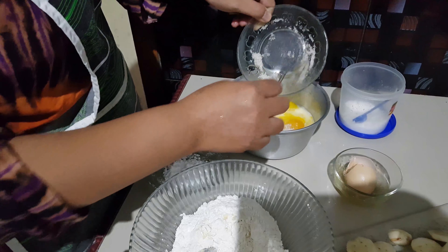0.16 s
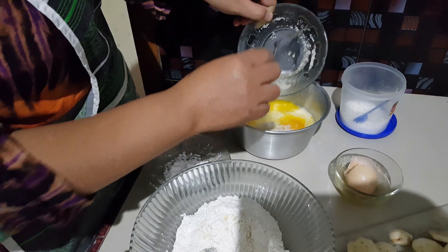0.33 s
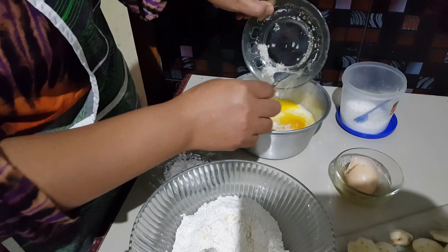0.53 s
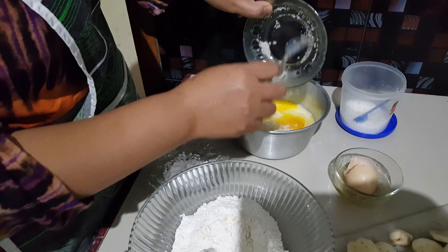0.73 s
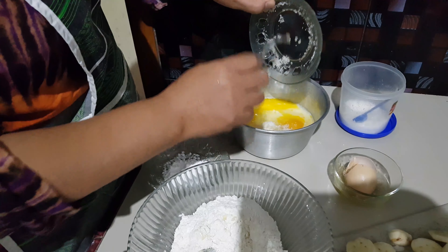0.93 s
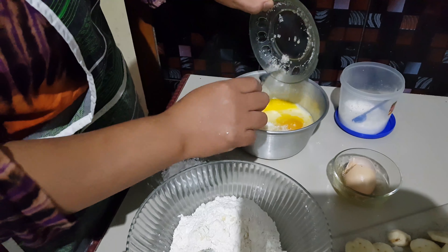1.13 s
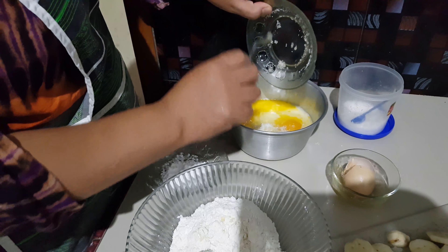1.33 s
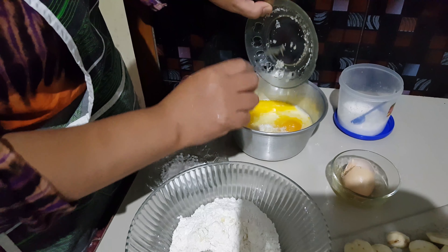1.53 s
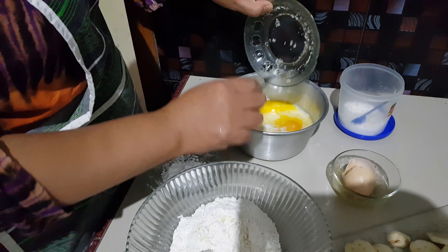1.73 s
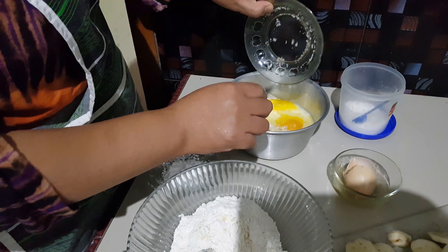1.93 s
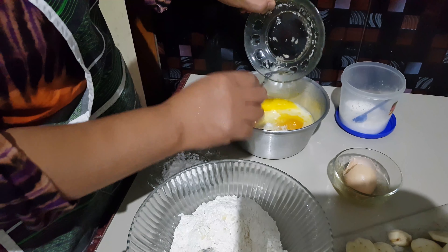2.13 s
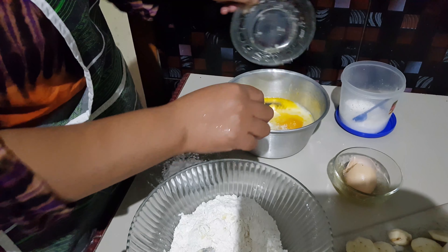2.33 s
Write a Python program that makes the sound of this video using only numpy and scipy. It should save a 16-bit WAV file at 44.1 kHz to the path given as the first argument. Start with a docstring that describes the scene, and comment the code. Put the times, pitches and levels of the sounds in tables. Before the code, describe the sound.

Sharp, irregular spoon clinks on a hand-held glass bowl, with gritty sugar scrapes in a small kitchen

```python
"""A metal spoon knocks and scrapes sugar out of a small hand-held glass bowl, about three strokes a second.
Knocks are filtered pushes that ring damped glass and spoon modes plus a noise clack; scrapes are
trains of grain cracks that drive the glass; squeals are gliding tones; sliding sugar is fading crack noise.
A small kitchen answers with a noise-tail echo over low rumble and hum; a fast limiter eases the peaks."""
import sys
import numpy as np
from scipy import signal
from scipy.fft import rfft, irfft
from scipy.io import wavfile
from scipy.ndimage import uniform_filter1d, minimum_filter1d

SR = 44100
rng = np.random.default_rng(int(sys.argv[2]) if len(sys.argv) > 2 else 0)


def master_out(mix):
    """Clip the mix to full scale and print it as 16-bit PCM to the path in sys.argv[1]."""
    frames = np.transpose(np.atleast_2d(mix))
    ceiling = np.clip(frames, -1, 1)
    pcm = np.round(ceiling * 32767).astype(np.int16)
    wavfile.write(sys.argv[1], SR, pcm)


N = 104472
T = np.arange(N) / SR

# corner points of the force spectra of knocks and scrapes: [f/Hz]
FORCE_HZ = (600, 2000, 4700, 7500, 13000)
# glass modes damped by the fingers: [f/Hz, t60/s, level over the clack/dB]
BOWL_MODES = [(597, .05, 1), (4637, 0.042, 22), (4695, 0.023, -3), (5680, 0.068, -12.5),
              (7506, 0.033, 17.5), (7582, 0.046, 9), (11350, 0.029, 17.5), (11500, .035, 16),
              (14100, 0.031, 16.5), (15200, .03, 10.5)]


def undb(db):
    """Amplitude factor of a level in dB."""
    return 10 ** (np.asarray(db) / 20)


def curve(hz, points):
    """Straight lines through (Hz, value) points on a log frequency axis."""
    f, v = np.array(points, float).T
    return np.interp(np.log(np.maximum(hz, 1)), np.log(f), v)


def convolve(x, response):
    """Response of a linear system, cut to the scene's length."""
    return signal.fftconvolve(np.atleast_2d(x), np.atleast_2d(response), axes=-1)[:, :N]


def colour(x, points, size=2048):
    """Minimum-phase filter of the given (Hz, dB) shape, by folding the cepstrum."""
    cepstrum = irfft(np.log(undb(curve(np.fft.rfftfreq(size, 1 / SR), points))))
    cepstrum[1:size // 2] *= 2
    cepstrum[size // 2 + 1:] = 0
    return convolve(x, irfft(np.exp(rfft(cepstrum))))


def lowpass(x, hz):
    """Second-order Butterworth low-pass."""
    return signal.sosfilt(signal.butter(2, min(hz, .45 * SR), fs=SR, output="sos"), x)


def fade(t, t60):
    """Exponential decay, -60 dB at t60."""
    return np.exp(-np.log(1000) * t / t60)


def walk(rate_hz):
    """Smooth random wander of spread 1."""
    v = lowpass(rng.standard_normal(N), rate_hz)
    return v / v.std()


def gate(t, length, edge, release):
    """Linear rise, hold and release."""
    rise = np.clip(t / edge, 0, 1)
    return rise * np.clip((length - t) / min(release, length / 2), 0, 1)


def add(out, start, x):
    """Mix x into out from start, in seconds."""
    i = max(int(start * SR), 0)
    x = np.ravel(x)[:N - i]
    out[i:i + len(x)] += x


def knocks():
    """Each knock is one sharp push that rings glass and spoon, with a freshly drawn clack."""
    # spoon meets bowl: [t/s, force at each FORCE_HZ/dB (five columns), spoon ring/dB]
    blows = [ (0.1136, 8.5, 26.5, 20.5, 1, 14, -11), (.389, 15.5, 1, -20, 1, -26, -12),
             (.398, 11.5, 17.5, 2.5, 1, -11, -3.5), (0.5189, 10, 23.5, 10.5, 8, 21, -3),
             (.712, 15.5, 15, 11.5, 6, 4.5, -18.5), (1.035, 12.5, 17.5, 0, 15.5, 8, -37.5),
             (1.05, -9, 7, 15.5, -6.5, 10, -37), (1.068, 0, -2, -5, -5, -1, -20),
             (1.099, 9.5, 18, 14.5, 7, 8, -10), (1.165, -6.5, 0.5, -0.5, -0.5, -9, -1.5),
             (1.316, 12, 17, 15, 12.5, 2, -23), (1.331, 9, 16, 0, -10, -15, -22),
             (1.3374, 11, 18.5, -2, 13.5, 8, -27), (1.3699, 14, 27.5, 13, 17.5, 9, -26),
             (1.567, -29, -17, -18, -17, -10.5, -24), (1.614, 17.5, 19.5, 19, 16.5, 7, -27),
             (1.654, 20, 24.5, 18, 11, 10, -21), (1.713, -14, -3, -8, -8, -7.5, -24),
             (1.8812, 13.5, 23, 23.5, 18.5, 11.5, -39), (1.899, 12.5, 14, 6, -17, -11, -20),
             (1.907, 10.5, 18, 13, 9, 4, -14), (2.0222, -9, -3, -9, -7.5, -0.5, 2.5),
             (2.077, -24, 1.5, -10, -5.5, -2, 1), (2.1611, 5, 20, 11.5, 12.5, 14.5, -1.5),
             (2.2083, -7, 7.5, 4.5, 14, 12, -1.5)]
    # spoon modes: [f/Hz, t60/s, level over the clack/dB]
    spoon_modes = [(1976, 0.054, 2), (2517, 0.071, 12), (4124, 0.03, 21), (5924, 0.096, 20.5),
                   (5982, 0.053, 21), (8210, 0.026, 18), (13900, 0.043, 14.5), (15400, 0.043, -11.5)]
    # clean clink against the full clack: [f/Hz, level/dB]
    clink = [(250, 0.5), (330, -1.5), (430, 1.5), (900, -1), (2100, 0), (3100, -2.5), (4000, -3),
             (6000, -2.5), (9000, -0.5)]
    out, glass, metal = np.zeros((2, N)), ring(BOWL_MODES), ring(spoon_modes)
    for start, *force_db, spoon_db in blows:
        push = colour(np.ones(1), list(zip(FORCE_HZ, force_db)))
        contact = colour(clack(), clink)[:, :len(glass)]
        sound = convolve(push, contact + glass + undb(spoon_db) * metal)
        add(out[0], start, sound[0])
        add(out[1], start, sound[1])
    return out


def ring(modes):
    """Response of an object to one blow: a sum of decaying modes with a soft onset."""
    build_s = 0.00073
    t = T[:N // 8]
    tones = np.zeros(len(t))
    for hz, t60, db in modes:
        rate = 2 * np.log(1000) / (t60 * SR)  # evens out the peak gain of short and long modes
        tones += undb(db) * rate * fade(t, t60) * np.cos(2 * np.pi * hz * t)
    return tones * (1 - np.exp(-t / build_s))


def clack():
    """Dense, quickly dying noise of the contact; its treble differs between the ports."""
    t60_s, build_s, wide_hz = 0.031, 0.0004, 7840
    # dead clack of the contact: [f/Hz, level/dB]
    clack_shape = [(60, -15), (180, -22), (300, -3.5), (550, 0), (800, -9), (1100, 2.5), (1400, -2),
                   (1900, 1.5), (2500, -3.5), (3050, 0.5), (3600, -2), (4300, 3), (5000, 4), (5500, 0.5),
                   (6000, 2.5), (6800, -1.5), (7800, 4.5), (9000, -8.5), (10300, -1), (12400, 4),
                   (13400, -3.5), (15500, -2), (16500, -14)]
    t = T[:N // 8]
    mid, side = rng.standard_normal((2, len(t))) * fade(t, t60_s) * (1 - np.exp(-t / build_s))
    side = colour(side, [(wide_hz / 10, -14), (wide_hz, -2)])[0, :len(mid)]
    pair = np.array([mid + side, mid - side])
    return colour(pair / np.sqrt(np.sum(pair ** 2) / 2), clack_shape)


def scrapes():
    """Sugar grains crack under the dragging spoon; returns their force on the glass."""
    edge_s, release_s = 0.0035, 0.011
    # spoon drags over sugar: [t/s, length/s, force at each FORCE_HZ/dB (five columns)]
    drags = [ (0, 0.049, -38.5, -21.5, -37.5, -32, -27), (0.038, 0.022, -47, -22, -26.5, -28.5, -26),
             (0.073, 0.022, -31, -35, -20.5, -38.5, -40), (.055, 0.048, -47, -40, -35.5, -29.5, -23.5),
             (0.112, 0.0092, -21, -14.5, -13, -17, -24), (0.127, 0.061, -34.5, -41, -51, -30.5, -30.5),
             (0.171, 0.06, -43, -48, -26.5, -24, -29.5), (0.383, 0.022, -19, -15.5, -24, -16, -20.5),
             (.405, .11, -28.5, -28, -33, -38, -29), (0.448, 0.016, -26, -34, -31, -14, -25.5),
             (0.747, .085, -30, -41.5, -36, -27, -30), (0.829, 0.027, -35, -36, -33, -31, -27.5),
             (1.039, 0.083, -22, -20.5, -24.5, -21.5, -33.5), (1.094, 0.014, -11, -12, -14.5, -21, -15),
             (1.117, 0.064, -29.5, -34, -36, -31, -29), (1.344, 0.022, -16, -38, -37, -46, -49),
             (1.37, 0.03, -14.5, -16.5, -13, -18, -11), (1.396, 0.079, -28.5, -33.5, -58, -33, -30.5),
             (1.634, 0.023, -21, -22, -20, -23, -33), (1.653, 0.0089, -17, -11, -4.5, -26, -21.5),
             (1.666, 0.074, -27.5, -36, -41, -35, -31.5), (1.904, .014, -33, -15, -19, -29.5, -40),
             (1.888, 0.054, -33.5, -18.5, -34, -27, -28.5), (1.945, 0.033, -28, -21.5, -18, -18, -14),
             (1.973, 0.045, -29.5, -38, -26.5, -30.5, -39), (2.195, 0.021, -36, -31, -23.5, -16, -27.5)]
    # grinding against a clean knock: [f/Hz, level/dB]
    grind = [(250, -12.5), (450, -4.5), (620, 1), (1050, 4), (1500, 6), (2000, -2.5), (3100, 8.5),
             (4600, -1.5), (7500, -2), (15000, -2.5)]
    force, cracks = np.zeros(N), grains()
    for start, length, *force_db in drags:
        run = cracks[max(int(start * SR), 0):][:int(length * SR)]
        run = run * gate(T[:len(run)], length, edge_s, release_s)
        add(force, start, colour(run, list(zip(FORCE_HZ, force_db))))
    return colour(force, grind)


def grains():
    """Dense stream of tiny cracks of random sign and size, in uneven runs."""
    grains_per_s, scatter_db, uneven_db, uneven_hz = 5000, 3, 2.0, 81
    hits = rng.random(N) < grains_per_s / SR
    size = undb(scatter_db * np.minimum(rng.exponential(size=N), 4))
    cracks = hits * rng.choice([-1, 1], N) * size
    return cracks / cracks.std() * undb(uneven_db * walk(uneven_hz))


def squeals():
    """Short gliding stick-slip tones with a weaker octave; grains make the pitch stumble. The last tone is a
    brief ping of the spoon."""
    edge_s, octave_db, stumble_hz = 0.0024, -11, 400
    # stick-slip, the last row a short ping of the spoon: [t/s, length/s, first f/Hz, last f/Hz, level/dB, pitch
    # jitter/share]
    slips = [ (0, 0.065, 3450, 2800, -27, 0.054), (0.043, 0.013, 1900, 2050, -20.5, .06),
             (0.057, 0.015, 1857, 1836, -7.5, 0.009), (.060, .019, 1863, 1740, -2.5, .008),
             (0.072, 0.017, 2470, 2550, -20.5, 0.0081), (.099, 0.033, 1780, 1736, -24, 0.013),
             (0.417, 0.014, 1035, 1115, -28.5, 0.062), (0.471, 0.018, 1058, 1042, -26.5, 0.048),
             (0.745, 0.041, 598, 636, -33, 0.18), (0.788, 0.027, 905, 1200, -33, 0.14),
             (0.817, 0.0244, 1400, 1428, -35, 0.11), (1.046, 0.0079, 2110, 2406, -11, 0.026),
             (1.094, 0.018, 602, 639, -19.5, 0.029), (1.356, 0.021, 1853, 1710, -27, 0.12),
             (1.621, .011, 2100, 2050, -19, .02), (2.205, 0.015, 1190, 1233, -30, 0.0044)]
    out, waver = np.zeros(N), walk(stumble_hz)
    for start, length, first_hz, last_hz, db, jitter in slips:
        t = T[:int(length * SR)]
        glide_hz = first_hz + (last_hz - first_hz) * t / length
        hz = glide_hz * (1 + jitter * waver[max(int(start * SR), 0):][:len(t)])
        phase = 2 * np.pi * np.cumsum(hz) / SR
        tone = np.cos(phase) + undb(octave_db) * np.cos(2 * phase)
        add(out, start, undb(db) * gate(t, length, edge_s, edge_s) * tone)
    return out


def slides():
    """A sugar crust breaks and slides off without ringing the glass: dry rustle, different at each port."""
    # break-off: [t/s, t60/s, level/dB]
    falls = [(.272, 0.09, -27.5), (0.2837, 0.041, -12.5), (.2995, 0.067, -17.5), (.308, 0.83, -27),
             (.432, 0.15, -26.5)]
    # sliding sugar: [f/Hz, level/dB]
    sugar = [(300, -33), (1500, -43), (2600, -4), (3100, -3), (5000, 0), (7000, -8), (9000, -3.5),
             (10500, 7), (13000, 3), (16000, -6)]
    flow = np.zeros(N)
    for start, t60, db in falls:
        flow += undb(db) * (T >= start) * fade(np.maximum(T - start, 0), t60)
    return colour(flow * np.array([grains(), grains()]), sugar)


def thud():
    """Soft low thump as the glass bowl bumps a mixing bowl: one decaying sine."""
    start_s, hz, t60_s, level_db = 1.881, 81.3, .07, -36
    t = np.maximum(T - start_s, 0)
    return undb(level_db) * np.sin(2 * np.pi * hz * t) * fade(t, t60_s)


def kitchen(x):
    """Diffuse echo of a small hard room: decaying noise whose treble dies a little sooner."""
    level_db, t60_s, treble_t60_s, build_s, split_hz = -11, 0.57, 0.45, 0.0027, 6300
    # room's answer: [f/Hz, level/dB]
    room_shape = [(200, -4.5), (600, 2.5), (2000, 0.5), (3300, -1), (4600, -1.5), (6000, 3), (8500, -4.5),
                  (15000, -1.5)]
    t = T[:N // 3]
    noise = rng.standard_normal((2, len(t)))
    low = lowpass(noise, split_hz)
    highpass = signal.butter(2, min(split_hz, SR / 3), "high", fs=SR, output="sos")
    high = signal.sosfilt(highpass, noise)
    # minus: the two bands are in antiphase at the split
    tail = (low * fade(t, t60_s) - high * fade(t, treble_t60_s)) * (1 - np.exp(-t / build_s))
    return undb(level_db) * convolve(x, colour(tail / np.sqrt(np.sum(tail ** 2) / 2), room_shape))


def background():
    """Low household rumble of shaped noise, with a faint hum of wandering pitch."""
    rumble_db, side_db, hum_hz, hum_db = -50, -10, 98, -57
    # steady rumble: [f/Hz, relative level per Hz/dB]
    floor = [(20, -15), (48, -2.5), (95, -3), (140, -3.5), (200, -16), (500, -19.5), (1500, -26.5),
             (5000, -29), (16000, -31)]
    shape = undb(curve(np.fft.rfftfreq(N, 1 / SR), floor))
    mid, side = irfft(rfft(rng.standard_normal((2, N))) * shape, N)
    rumble = (mid + undb(side_db) * side * np.array([[1], [-1]])) / mid.std()
    pitch_hz = hum_hz * (1 + 0.025 * walk(3.3))
    hum = np.sin(2 * np.pi * np.cumsum(pitch_hz) / SR)
    return undb(rumble_db) * rumble + undb(hum_db) * hum


def scene():
    """Knocks, scrapes, squeals and sliding sugar at the moving bowl, then thud, room and background."""
    # bowl drifts in front of the microphone: [t/s, left minus right level/dB]
    bowl_pan = [(0, -3), (.45, -4), (.75, -1), (1.1, -0.5), (1.65, -0.5), (2.2, -4)]
    force = scrapes()
    scraped = convolve(force, clack()) + convolve(force, ring(BOWL_MODES))
    direct = knocks() + scraped + squeals() + slides()
    pan_db = np.interp(T, *np.array(bowl_pan).T)
    panned = direct * undb(np.array([pan_db, -pan_db]) / 2)
    return panned + kitchen(direct) + thud() + background()


def record(dry):
    """Two ports colour the sound differently; a fast limiter eases peaks, the rest clips; the top is cut."""
    limit, hold_s, slope, top_hz = 0.97, .003, .4, 15900
    # between the microphone ports: [f/Hz, left minus right level/dB, left phase lead/rad]
    port_table = [(98.6, 1, -0.38), (500, 3.5, 0), (1310, 2, 1), (2210, -1.5, -0.62), (3370, -1.5, -2),
                  (5000, 3.5, -1.22), (8100, 1.5, -1.96), (9000, -5.5, -2.8), (10560, -7.5, 1),
                  (14900, -6.5, 1)]
    hz, ports = np.fft.rfftfreq(N, 1 / SR), np.array(port_table)
    level_db, lead_rad = curve(hz, ports[:, :2]), curve(hz, ports[:, ::2])
    lean = undb(level_db / 2) * np.exp(1j * lead_rad / 2)  # half to each port
    x = irfft(rfft(dry) * np.array([lean, 1 / lean]), N)
    hold = max(int(hold_s * SR), 2)
    full_gain = limit / np.maximum(np.abs(x), limit)
    # the exponent takes off only part of the overshoot
    gain = uniform_filter1d(minimum_filter1d(full_gain, hold), hold) ** slope
    top_cut = signal.ellip(8, .2, 70, top_hz, fs=SR, output="sos")
    return signal.sosfilt(top_cut, np.clip(x * gain, -1, 1))


dry = scene()
out = record(dry)
master_out(out)
```